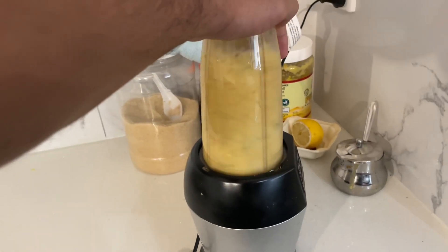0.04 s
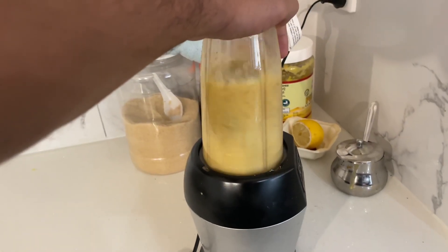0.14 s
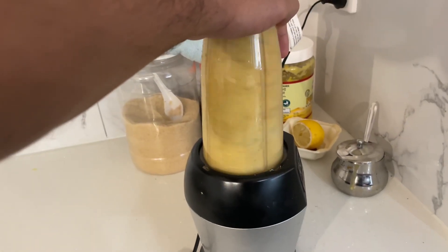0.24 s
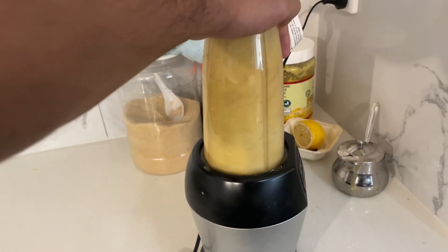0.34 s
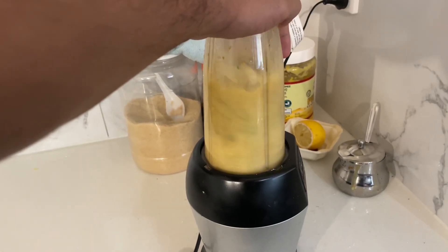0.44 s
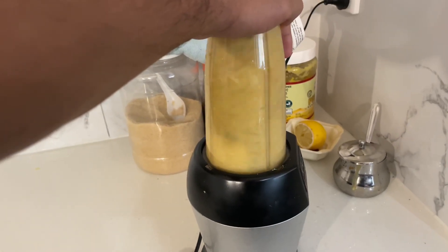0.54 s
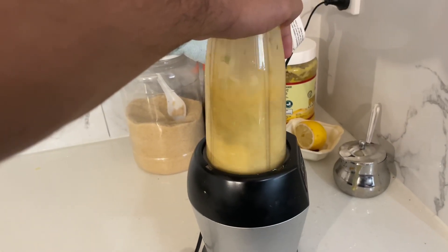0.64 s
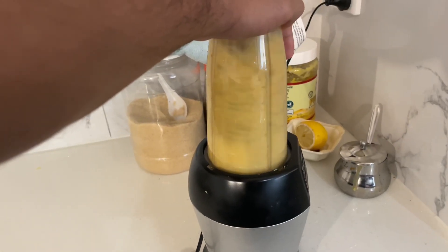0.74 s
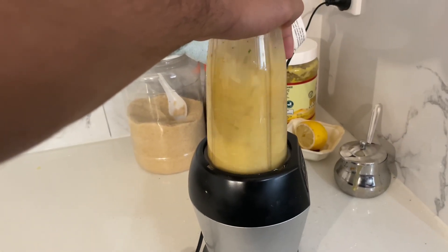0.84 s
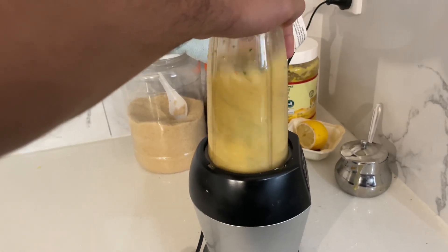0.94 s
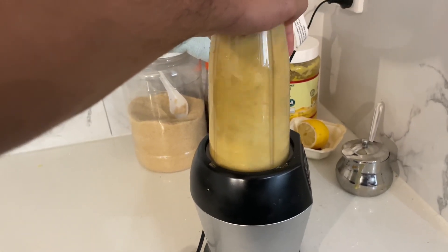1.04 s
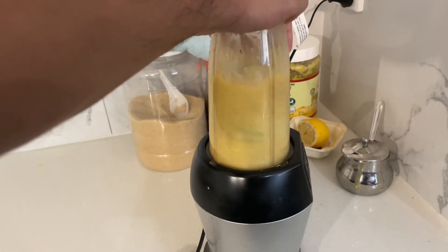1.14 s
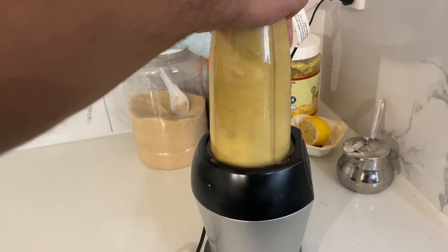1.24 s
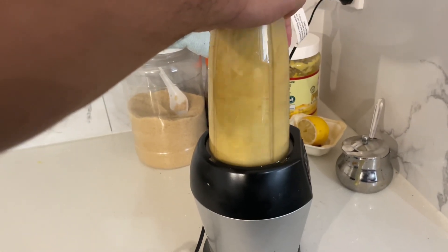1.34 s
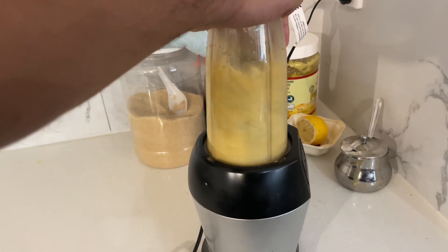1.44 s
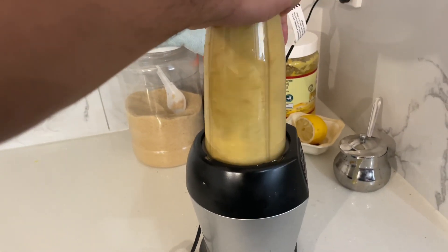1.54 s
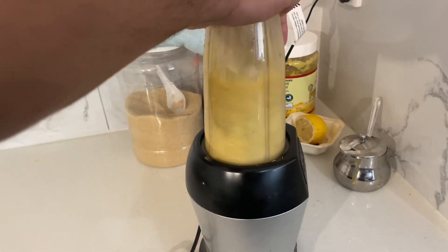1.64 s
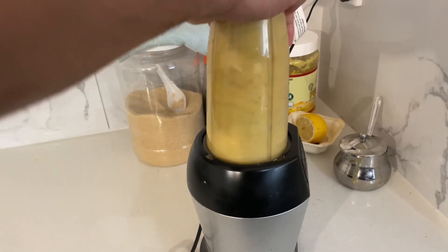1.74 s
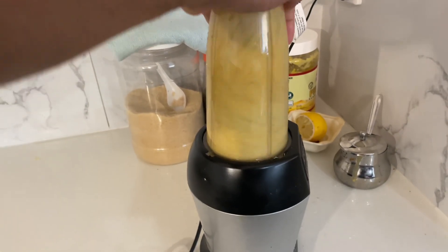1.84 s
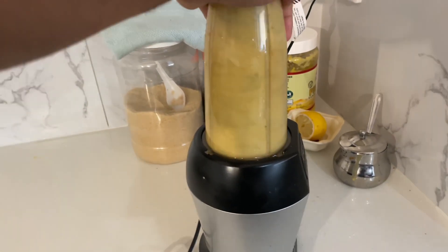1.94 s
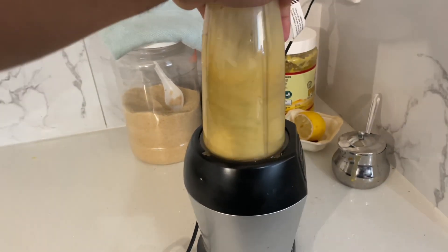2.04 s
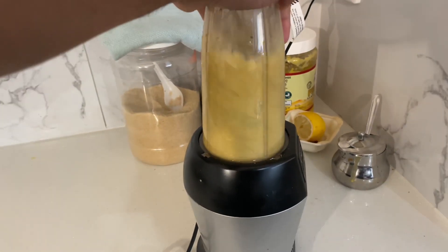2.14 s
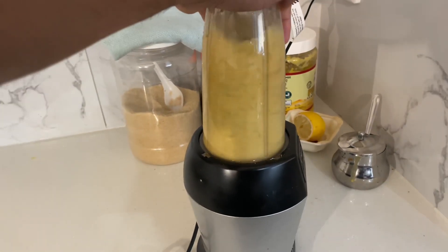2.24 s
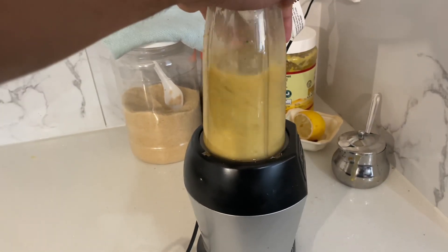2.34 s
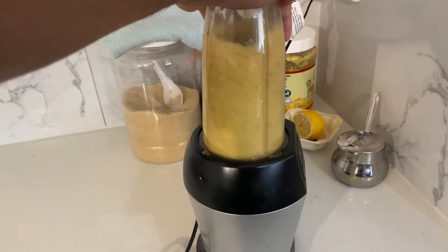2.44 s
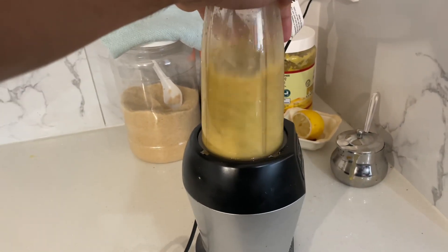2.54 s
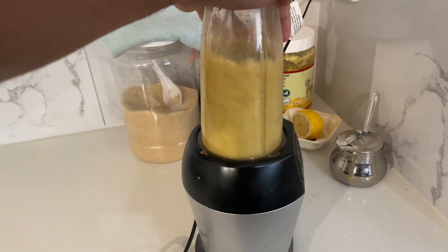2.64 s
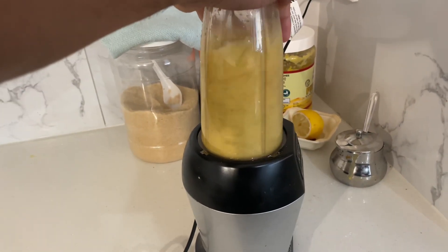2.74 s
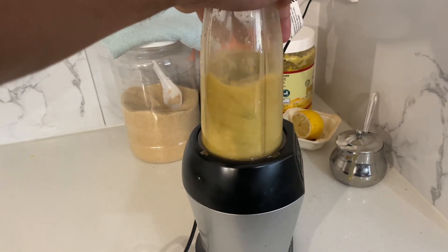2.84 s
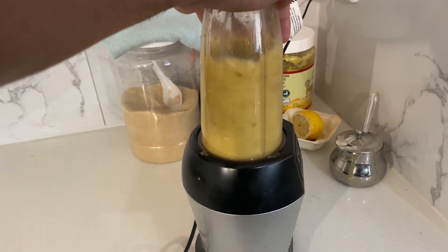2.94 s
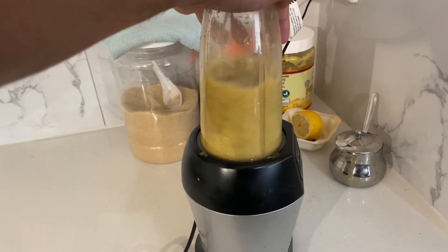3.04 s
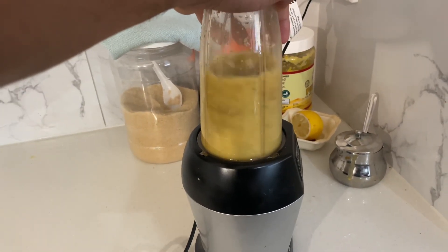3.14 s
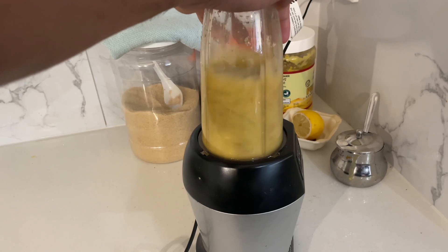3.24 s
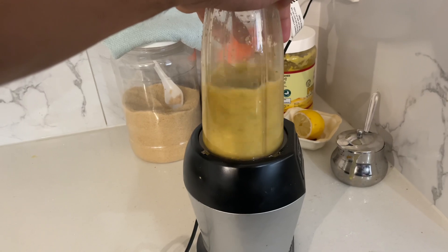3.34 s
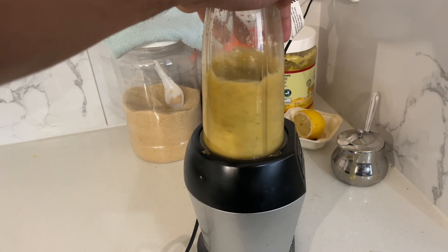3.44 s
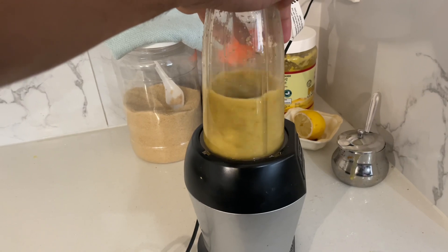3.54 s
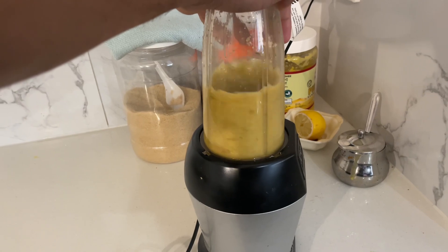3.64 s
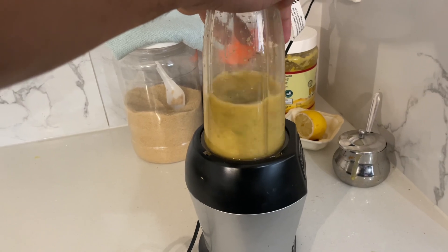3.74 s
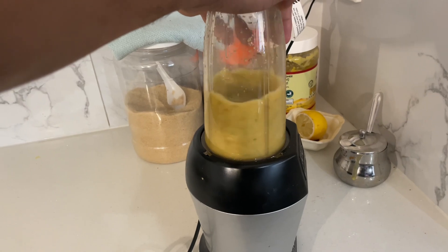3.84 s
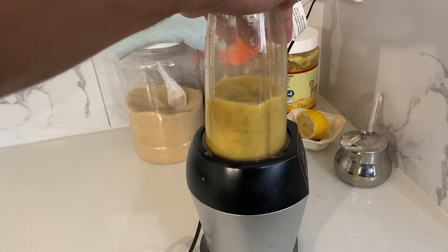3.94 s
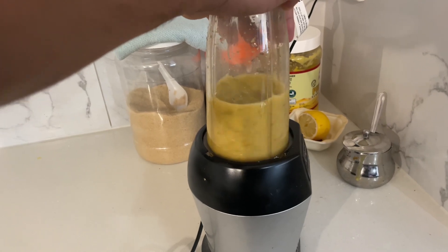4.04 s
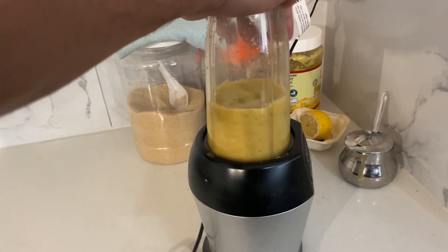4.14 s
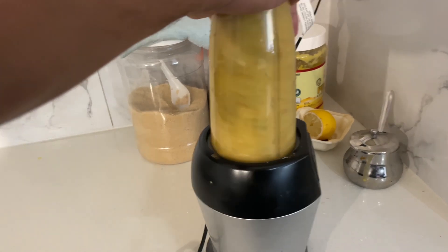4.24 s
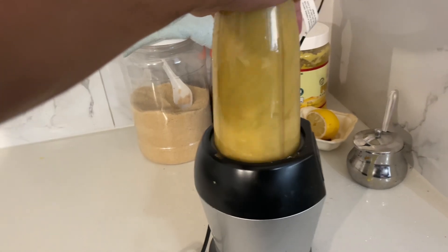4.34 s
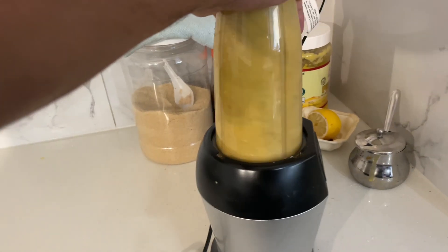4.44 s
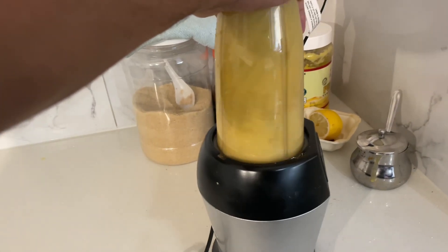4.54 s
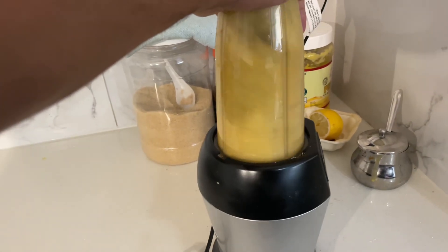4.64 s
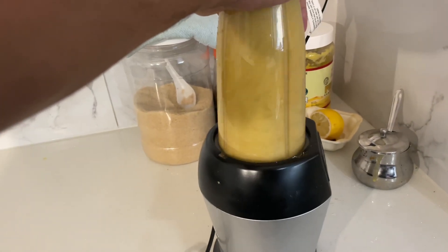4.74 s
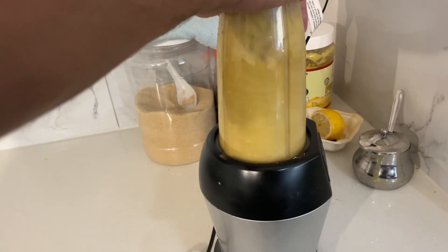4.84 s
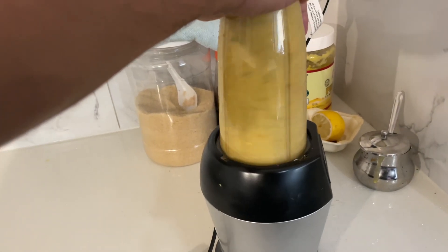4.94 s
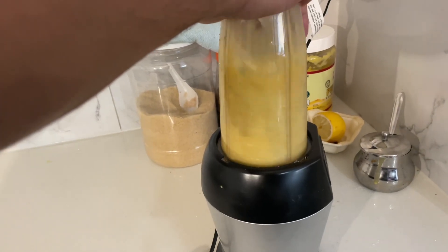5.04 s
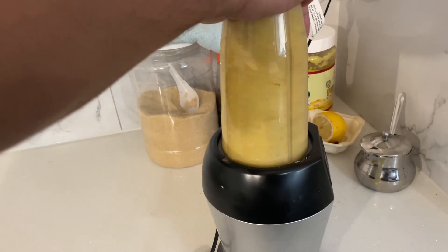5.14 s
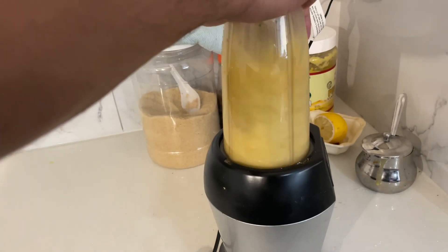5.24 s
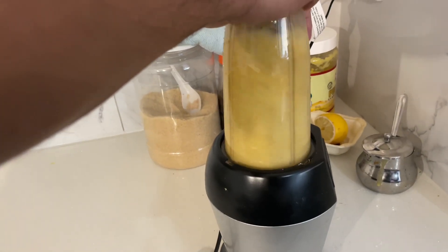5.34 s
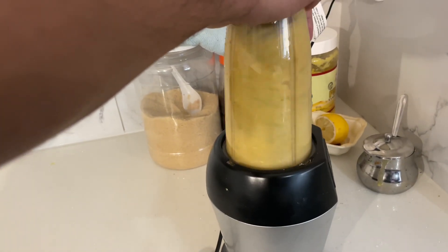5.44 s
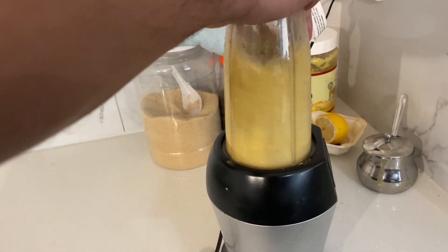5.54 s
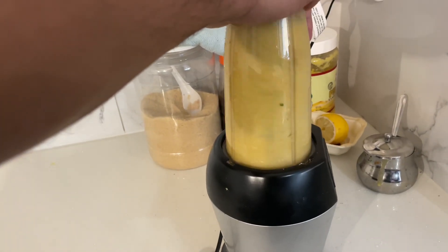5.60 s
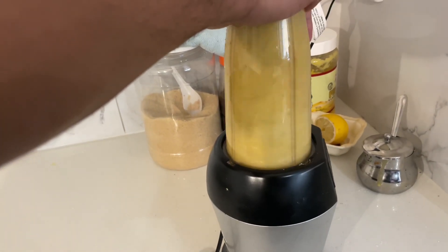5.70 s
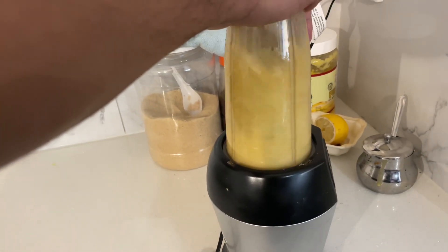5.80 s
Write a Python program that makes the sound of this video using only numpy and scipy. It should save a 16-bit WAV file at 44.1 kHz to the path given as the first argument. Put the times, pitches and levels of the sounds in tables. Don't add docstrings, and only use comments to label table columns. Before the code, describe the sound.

Close phone pickup of a small kitchen blender at full speed, buzzing and slapping thick drink. It dips in pitch and recovers within the first second or so, then winds down into a low, clacking rattle. A short near-silence with faint room tone follows, then a cup scrapes and knocks down, and the motor jumps back to a loud, rough whir until the end.

```python
import sys
import numpy as np
from scipy import signal
from scipy.fft import rfft, irfft, next_fast_len
from scipy.io import wavfile
from scipy.ndimage import uniform_filter1d

SR = 44100
rng = np.random.default_rng(int(sys.argv[2]) if len(sys.argv) > 2 else 0)


def wav_out(sig):
    wavfile.write(sys.argv[1], SR, np.round(np.clip(np.atleast_2d(sig).T, -1, 1) * 32767).astype(np.int16))


def invert_db(level):
    return 10 ** (np.asarray(level, dtype=float) / 20)


N = 258867
TIME = np.arange(N) / SR
FULL_SPEED_HZ = 272
PRESS_S = 4.1313


def evened(x):
    return x / np.sqrt(np.mean(x ** 2) + 1e-20)


def read(points, hz):
    f, value = np.transpose(points)
    return np.interp(np.log(hz + 1), np.log(f + 1), value)


def bells(rows):
    return sum(np.outer(change, np.exp(-((TIME - s) / length) ** 2)) for s, length, *change in rows)


def drift(hz):
    size = max(int(SR / hz), 2)
    once = uniform_filter1d(rng.standard_normal(N), size)
    return evened(uniform_filter1d(once, size))


def coloured(x, points):
    log_gain = np.log(invert_db(read(points, abs(np.fft.fftfreq(8192, 1 / SR)))))
    phase = -signal.hilbert(log_gain).imag
    taps = np.fft.ifft(np.exp(log_gain + 1j * phase)).real[:4096]
    return signal.oaconvolve(x, taps[None] / np.linalg.norm(taps), axes=1)[:, :x.shape[1]]


def resonate(x, hz, width_hz):
    turn = np.exp(2j * np.pi * np.cumsum(hz * np.ones(x.shape[1])) / SR)
    r = np.exp(-np.pi * width_hz / SR)
    return 2 * (turn * signal.lfilter([1 - r], [1, -r], x / turn)).real


# (frequency [Hz], width [Hz], level [dB])
BASE_MODES = [(825, 310, 0.5), (1150, 126, 1.5), (1506, 31, 8.5), (1924, 290, 7.5), (2206, 130, 8.5),
              (2845, 330, 1.5), (3450, 140, 7), (3800, 26, 11.5)]


def shell(x):
    out = 0
    for hz, width_hz, db in BASE_MODES:
        narrow = resonate(x, hz, 1.12 * width_hz)
        out = out + invert_db(db) * resonate(narrow, hz, 10.4 * width_hz)
    return out


# (time [s], shaft speed [Hz], churn effort [dB])
COAST = [(0, 292, -22.5), (.365, 290, -22.5), (.43, 246, -26), (.79, 158, -35), (.91, 222, -28),
         (1.05, 266, -24.5), (1.33, 286, -23), (1.75, 284, -22.5), (1.85, 248, -25), (2.3, 143, -35.5),
         (2.78, 76, -42), (3.24, 40, -50)]
STILL = [
    (3.75, 10, -71),
]
RESTART = [
    (4.17, 122.4, -35),
    (4.25, 194.3, -28),
    (4.33, 238, -24),
    (4.74, 286.2, -20),
    (5.87, 291.2, -22.5),
]


def shaft():
    s, speed_hz, effort_db = np.transpose(np.concatenate([COAST, STILL, RESTART]))
    return np.interp(TIME, s, speed_hz), np.interp(TIME, s, effort_db)


def running(stop_s, fade_s):
    start_s = RESTART[0][0]
    return np.interp(TIME, [stop_s - fade_s, stop_s, start_s - .03, start_s], [1, 0, 0, 1])


# (shaft speed [Hz], level [dB])
UNBALANCE = [(39, -72), (54, -53), (85, -43.5), (97, -62), (125, -46), (200, -37), (258, -34.5), (282, -25)]
# (multiple of the shaft speed, level [dB])
OVERTONES = [(2, -.5), (3, 1), (5, -.5), (6, -10), (7, -8), (12, -13)]
# (time [s], length [s], unbalance change [dB], blade-pass change [dB], speed change [Hz])
LOADS = [(0.075, 0.061, -2.5, 3.5, 2), (.2, 0.038, 0.5, -9, -4.5), (.26, 0.054, 1, 2, 0),
         (1.12, .03, 4, -1, -2), (1.194, 0.048, -3.5, -18, 0.5), (1.345, 0.039, 1, 8, 2),
         (1.42, 0.031, 0, -1, -2.5), (1.56, 0.063, -1.5, 10.5, 8), (1.64, .02, -4, -15, -4.5),
         (1.7, 0.055, 4.5, 5.5, 0), (4.21, 0.051, -7, 4, 0), (4.41, 0.0513, 3.5, -4, -5),
         (4.56, 0.024, 7.5, 0, 4), (4.62, 0.041, -3, -5, 0), (4.75, 0.053, 5, 5, 3),
         (4.83, 0.0407, 3, -1, -4), (4.96, 0.038, 0, 0.5, 4), (5.14, 0.059, 1.5, 8, 2),
         (5.22, 0.044, -14.5, 0.5, 2), (5.32, .03, -1, 0, -5), (5.4, 0.0395, -2, 3, 3),
         (5.46, 0.055, -10, -2, 4), (5.57, 0.037, 1, -10, -2), (5.7, .04, -9, -6, 3.5),
         (5.81, .06, -0.5, 0.5, -4)]


def motor():
    speed_hz, effort_db = shaft()
    tone_swing_db, blade_swing_db, speed_swing_hz = bells(LOADS)
    speed_hz = speed_hz + speed_swing_hz
    turns = np.cumsum(speed_hz * (1 + 0.0026 * drift(39))) / SR
    slack_db = .14 * np.minimum(speed_hz - FULL_SPEED_HZ, 0)
    tone_db = read(UNBALANCE, speed_hz) + tone_swing_db
    blade_db = effort_db - 11.5 + blade_swing_db + slack_db
    between_db = effort_db - 14.5 + 0.22 * blade_swing_db + slack_db

    out = invert_db(tone_db + 1.8 * drift(25)) * np.sin(2 * np.pi * turns)
    wobble = .12 * drift(30)
    out += invert_db(blade_db + 2.2 * drift(35)) * np.sin(2 * np.pi * (4 * turns + wobble))
    for multiple, db in OVERTONES:
        phase = multiple * turns + rng.random()
        out += invert_db(between_db + db + 2.4 * drift(23)) * np.sin(2 * np.pi * phase)
    return np.sqrt(2) * out * running(COAST[-1][0], .14), speed_hz, turns, effort_db


# (frequency [Hz], density [dB per Hz])
LIQUID = [(90, -13.5), (160, -9.5), (400, 3), (640, -0.5), (1000, 0.5), (1500, -2), (2100, -3), (2600, -5),
          (3500, 0), (3900, -7.5), (4200, -9), (5200, -14.5), (6200, -23), (8000, -31)]
# (frequency [Hz], density [dB per Hz])
SPRAY = [(3000, -32.5), (4500, -31), (5500, -10.5), (6600, 5.5), (8000, 6.5), (10000, 2), (12500, -1),
         (13800, 0.5), (14600, -37), (15700, -11)]
# (frequency [Hz], density [dB per Hz])
RUMBLE = [(20, -52), (40, -52), (62, -10), (84, 6), (105, -3.5), (150, -4), (250, -35)]
# (shaft speed [Hz], frequency [Hz])
CUP = [(40, 352), (150, 365), (290, 380)]
# (time [s], churn change [dB], extra boom [dB])
GULPS = [(.5, -2, 5.5), (1.09, 1, 8.5), (1.57, 1.5, 5), (2.46, -0.5, 3.5), (2.55, 3, -3), (1.35, 0.5, 4),
         (4.62, 1, 4), (3.47, 4, 1), (4.29, 0, 5.5), (4.325, 0, 4.5), (4.36, 1.5, -6), (4.555, 2.5, 1),
         (4.78, 2, 0), (5.02, 1.5, -17), (5.2, 2.5, -4), (5.29, 1, 2), (5.4, 1.5, -6), (5.74, 1.5, 0.5)]
# (time [s], length [s], rumble change [dB])
ROCKS = [
    (.25, 0.054, -1),
    (.9, .12, 5.5),
    (1.27, 0.049, 2.5),
    (1.77, .04, 5),
    (2.05, .2, -10),
    (3.2, .25, 8),
    (4.2, .05, 13),
    (4.9, 0.071, 4),
    (5.55, 0.039, -3),
]


def churn(speed_hz, turns, churn_db):
    gulp_db, gulp_boom_db = bells([(s, 0.035, *db) for s, *db in GULPS])
    slow = np.clip(1 - speed_hz / FULL_SPEED_HZ, 0, 1)
    coasting = np.sqrt(slow) * (TIME < PRESS_S)
    spray_db = -6 - 4.5 * slow + 0.38 * drift(9.5)
    boom_db = -11.5 + 9 * np.sqrt(slow) + gulp_boom_db + 1.1 * drift(6)
    rumble_db = -17 - 4.5 * slow + bells(ROCKS)[0] + 3 * drift(19)

    strength = invert_db(2.3 * rng.standard_normal(N // 50))[turns.astype(int)]
    slap = evened(5.0 + strength * np.exp(-(turns % 1) / 0.91))
    lumps = (rng.random(N) < 400 / SR) * invert_db(4.5 * np.minimum(rng.exponential(1, N), 3))
    lumps = evened(np.convolve(lumps, np.hanning(90), "same"))
    loose = .4 + .55 * slow
    envelope = evened((slap + 0.5 * loose ** 2 * lumps) * invert_db(0.76 * drift(20.5)))
    beat = envelope * rng.standard_normal((2, N))

    liquid = evened(coloured(beat, LIQUID)) + loose * evened(shell(beat))
    liquid = liquid / np.sqrt(1 + loose ** 2)
    liquid = liquid - coasting * resonate(liquid, 600, width_hz=78)
    liquid = liquid + 0.53 * coasting * resonate(liquid, 1870, width_hz=84)
    spray = invert_db(spray_db) * evened(coloured(beat, SPRAY))
    cup_hz = read(CUP, speed_hz)
    boom = resonate(resonate(beat, cup_hz, width_hz=58), cup_hz, width_hz=2.9 * 58)
    boom = invert_db(boom_db) * evened(boom)
    shaking = rng.standard_normal((2, N))
    feet = evened(resonate(shaking, 86, width_hz=16))
    rumble = invert_db(rumble_db) * (evened(coloured(shaking, RUMBLE)) + 0.46 * feet)
    level = invert_db(churn_db + gulp_db - 1.01) * running(STILL[0][0], 0.17)
    return level * (liquid + spray + boom + rumble)


# (time [s], peak [dB], brightness [dB], length [ms])
CLACKS = [(2.1894, -32, -5, 3.8), (2.2405, -38.5, -4, 4), (2.379, -24, 0, 6), (2.4039, -24.5, 4, 4.5),
          (2.5017, -32, 0, 4), (2.54, -34, 7, 15), (2.6357, -27, 6.5, 3.1), (2.7097, -31.5, 1, 3.3),
          (2.727, -36, 3, 3.8), (2.7673, -25, -5.5, 5.9), (2.8445, -28, 6.5, 5.3),
          (2.8863, -28.5, -17, 1.9), (2.9115, -29.5, 6, 2.2), (2.9378, -37, 7, 4), (2.9836, -31.5, 10, 3.7),
          (3.005, -31.5, 10, 2.7), (3.04, -28.5, -1, 3.2), (3.052, -38, 11, 3), (3.0606, -25.5, 1, 4.3),
          (3.0878, -29, -1.5, 4.3), (3.1487, -38, 6, 4), (3.1666, -34.5, 9.5, 3.3), (3.234, -34, 0, 3.9),
          (3.4221, -50, 4, 3.7), (3.4645, -43, 5, 4), (4.0362, -38, 5, 4.4)]
BOUNCE = [
    (4.161, -20, 1.5, 3.3),
]
SCRAPE = [
    (4.118, -41, 5, 4.3),
    (4.126, -35, 9, 3),
]
# (frequency [Hz], density [dB per Hz])
EDGE = [(700, -39), (1500, 4.5), (4000, 7.5), (7000, 0), (12000, -3), (15500, -16)]


def clacks():
    out = np.zeros((2, N))
    ms = np.arange(3000) * 1000 / SR
    for s, db, bright_db, length_ms in CLACKS + BOUNCE + SCRAPE:
        rise_ms = 0.87 * length_ms
        after_ms = np.maximum(ms - rise_ms, 0)
        envelope = np.minimum(ms / max(rise_ms, .2), 1) * np.exp(-after_ms / max(length_ms, .5))
        burst = rng.standard_normal((2, 3000)) * envelope
        body = shell(burst)
        edge = coloured(burst * np.exp(-after_ms / 5), EDGE)
        sound = body / abs(body).max() + 0.73 * invert_db(bright_db) * edge / abs(edge).max()
        out[:, round(s * SR):][:, :len(ms)] += invert_db(db + 1.5) * sound
    return out


# (frequency [Hz], level [dB])
KICK = [(105, -25.5), (190, -31), (310, -32.5)]


def thump():
    t = np.maximum(TIME - PRESS_S, 0)
    noise = rng.standard_normal((2, N)) * (t > 0)
    blow = (np.arange(N) == round(PRESS_S * SR)) * np.array([[1], [.4]])
    knock = invert_db(-20.5) * coloured(noise * np.exp(-t / 0.025) + 6.5 * blow, LIQUID)
    knock = signal.sosfilt(signal.butter(2, 420, "high", fs=SR, output="sos"), knock)
    crack = [(1200, -29), (2800, 11), (4000, -8), (9000, -16), (15000, -18)]  # (Hz, dB per Hz)
    snap = invert_db(-16.5) * coloured(noise * np.exp(-t / 0.0025), crack)
    late = np.maximum(t - 0.00713, 0)
    ring = invert_db(-23.5) * np.sin(2 * np.pi * 1210 * t) * np.exp(-t / 0.008)
    ring += invert_db(-20) * np.sin(2 * np.pi * 560 * late) * np.exp(-late / 0.0047)
    kick = sum(invert_db(db) * np.sin(2 * np.pi * hz * t) for hz, db in KICK)
    return knock + snap + ring + kick * t / 0.014 * np.exp(-t / 0.02)


# (frequency [Hz], density [dB per Hz])
KITCHEN = [(30, -24), (70, -18), (150, -24), (320, -10), (500, -9), (650, -16), (800, -11), (1150, -9),
           (1400, -14), (2500, -13), (4500, -19), (6800, -21), (8000, -30)]
# (frequency [Hz], density [dB per Hz])
KITCHEN_AIR = [(5000, -33), (7500, 7), (12000, -3), (13500, -6), (14500, -21), (15500, -30)]
# (frequency [Hz], width [Hz], level [dB])
FRIDGE = [(942, 20, -64), (1170, 40, -67), (58, 14, -68)]


def kitchen():
    air = evened(coloured(rng.standard_normal((2, N)), KITCHEN))
    air += invert_db(-12) * evened(coloured(rng.standard_normal((2, N)), KITCHEN_AIR))
    hum = 0
    for hz, width_hz, db in FRIDGE:
        hum = hum + invert_db(db) * evened(resonate(rng.standard_normal((2, N)), hz, width_hz))
    return invert_db(-55.5 + 0.75 * drift(7.3)) * air + hum


# (frequency [Hz], likeness [0-1])
LIKENESS = [(60, .97), (400, .95), (800, .78), (1250, .55), (2300, .78), (4500, .68), (5500, .5),
            (7300, .6), (8200, .85), (9500, .85), (10300, .66), (12300, .68), (12900, .99)]
# (frequency [Hz], phase [rad])
LEAD = [(60, 0), (860, .7), (1460, -.5), (2500, .8), (3530, 1.3), (5100, 1.3), (6000, -1.4), (7200, -1.8),
        (8200, -3), (9100, -3.2), (10100, -4), (11100, -4.8), (12200, -5.4), (12900, -6.28)]
# (frequency [Hz], level [dB])
LOUDER = [(60, 2.5), (110, -0.5), (200, 0), (380, 1), (700, 4.5), (1290, 5.5), (2380, 1), (4400, 3.5),
          (8120, 0.5), (15000, 1.5)]


def ports(shared, scattered):
    size = next_fast_len(N + 8192)
    hz = np.fft.rfftfreq(size, 1 / SR)
    like = np.clip(read(LIKENESS, hz), 0, 1)
    offset = np.exp(.5j * read(LEAD, hz)) * invert_db(read(LOUDER, hz) / 2)
    common = np.sqrt((1 + like) / 2) * rfft(shared, size)
    own = np.sqrt((1 - like) / 2) * rfft(scattered, size)
    return irfft(np.array([(common + own) * offset, (common - own) / offset]), size)[:, :N]


def scene():
    tones, *motion = motor()
    shared, scattered = churn(*motion) + clacks() + thump() + kitchen()
    echo = .7 * np.pad(tones, (48, 0))[:N]
    return ports(shared + tones, scattered + echo)


def top_cut(x):
    return signal.sosfilt(signal.butter(12, 15780, fs=SR, output="sos"), x)


def record(dry):
    thin = signal.sosfilt(signal.butter(2, 64.5, "high", fs=SR, output="sos"), dry)
    lowpass = signal.firwin(511, 15760, window=("kaiser", 9), fs=SR)
    mix = signal.oaconvolve(thin, lowpass[None], "same")
    return top_cut(mix)


dry = scene()
out = record(dry)
wav_out(out)
```